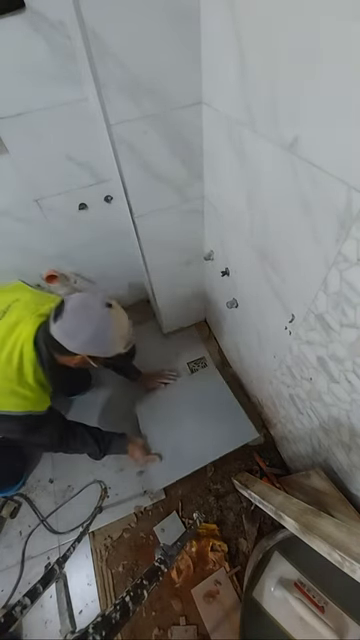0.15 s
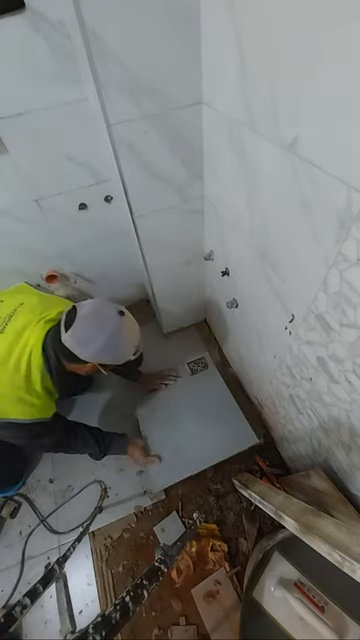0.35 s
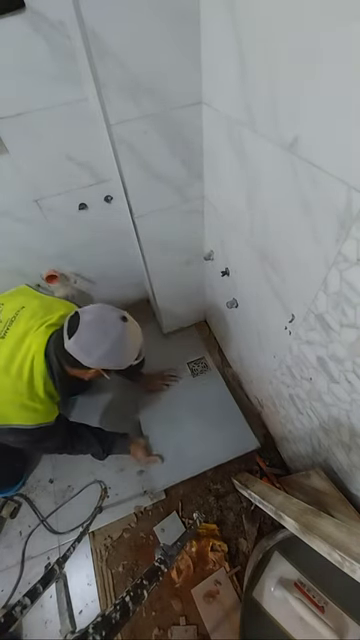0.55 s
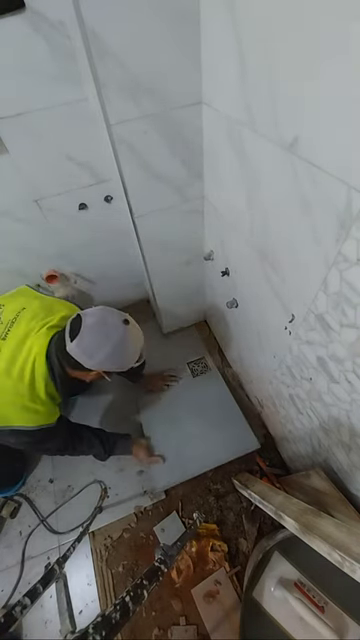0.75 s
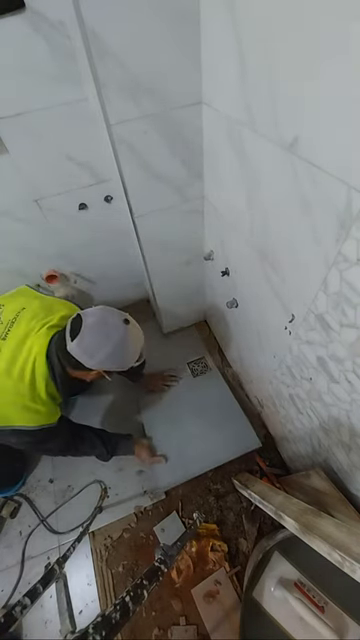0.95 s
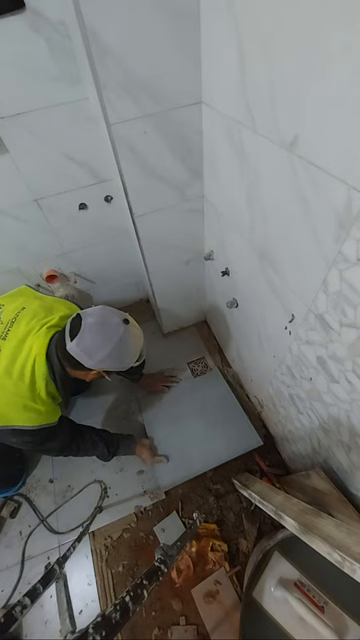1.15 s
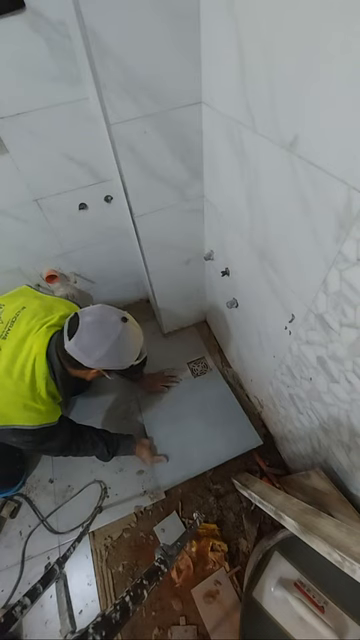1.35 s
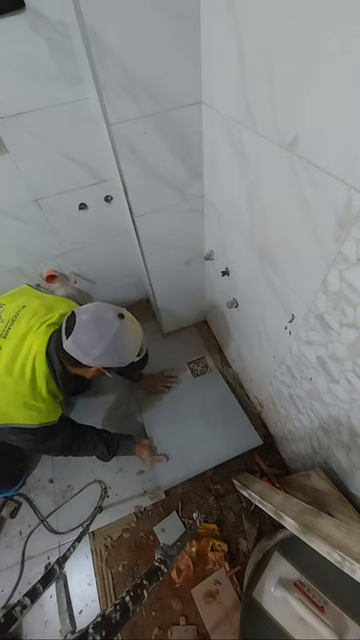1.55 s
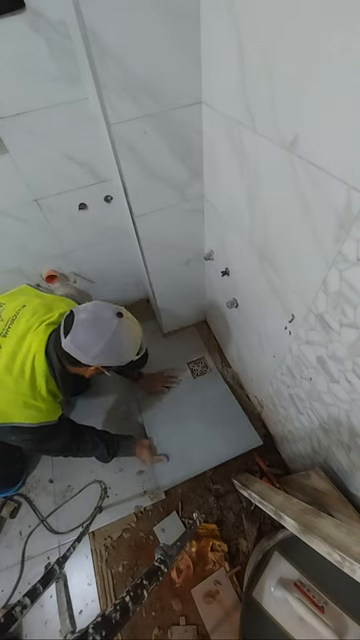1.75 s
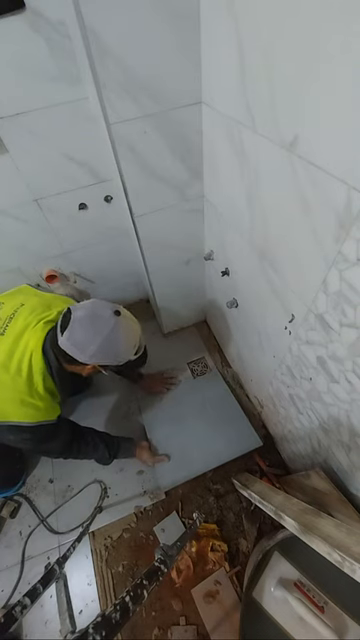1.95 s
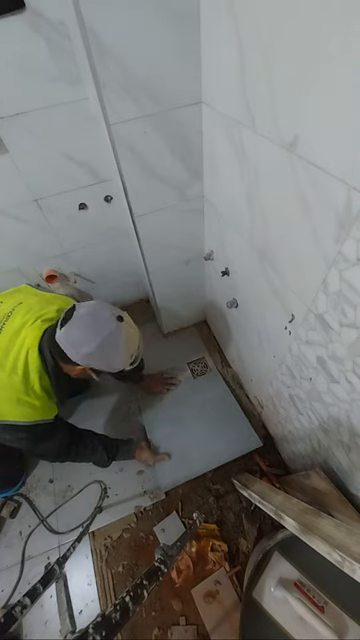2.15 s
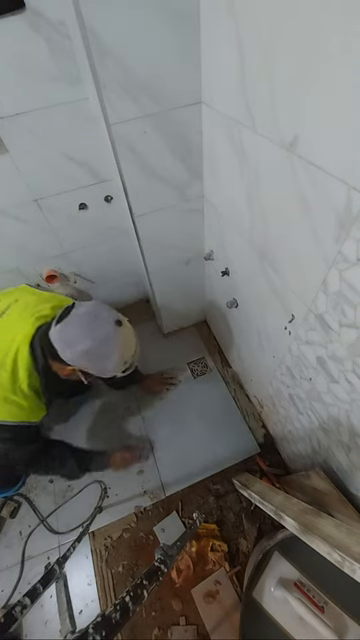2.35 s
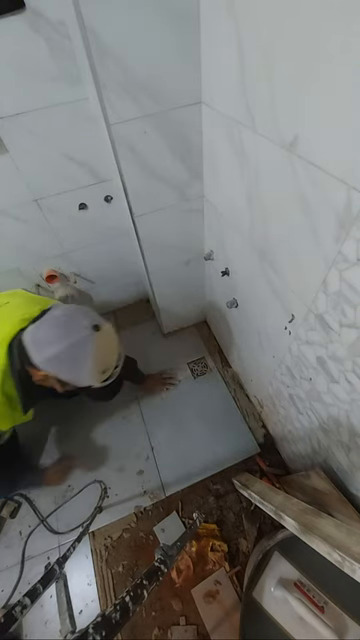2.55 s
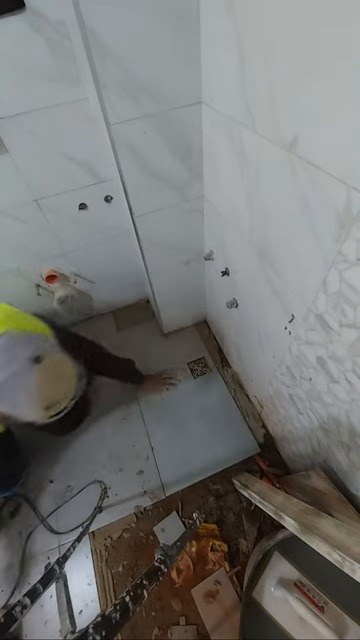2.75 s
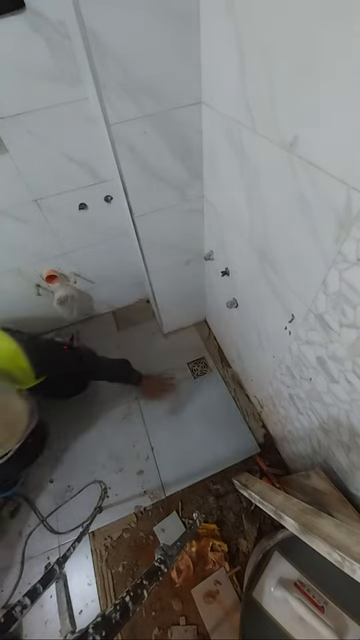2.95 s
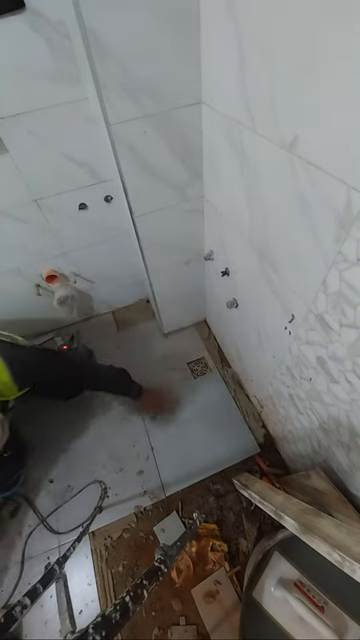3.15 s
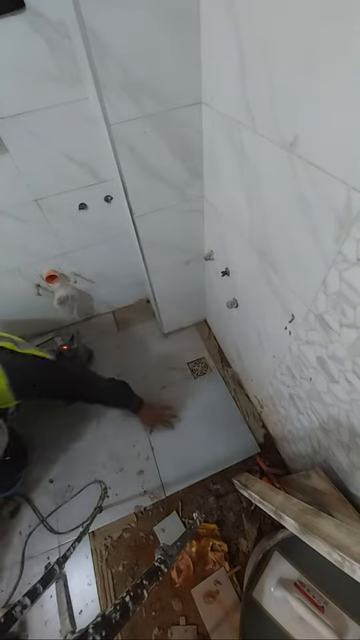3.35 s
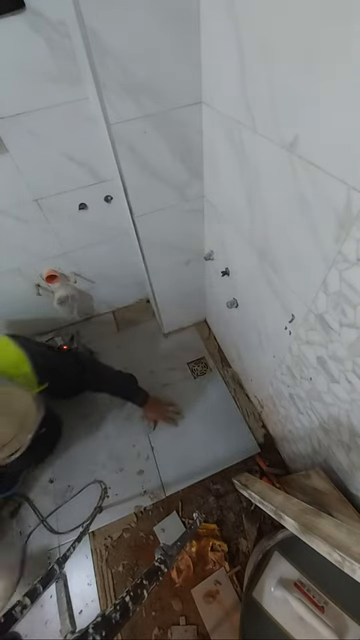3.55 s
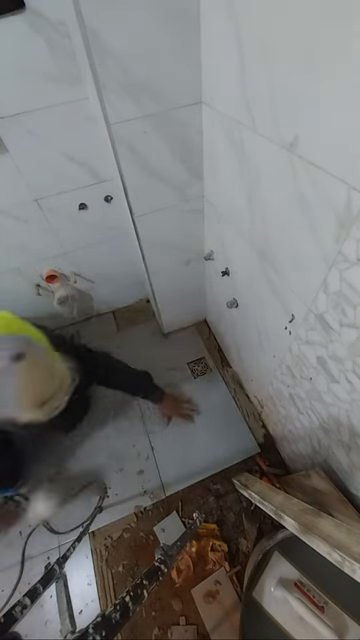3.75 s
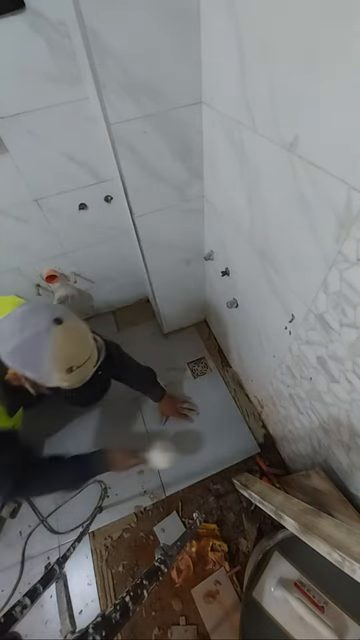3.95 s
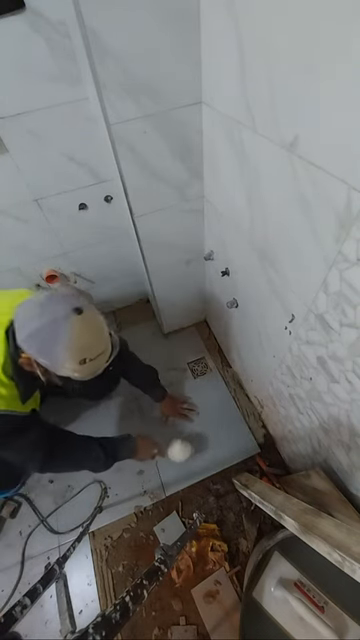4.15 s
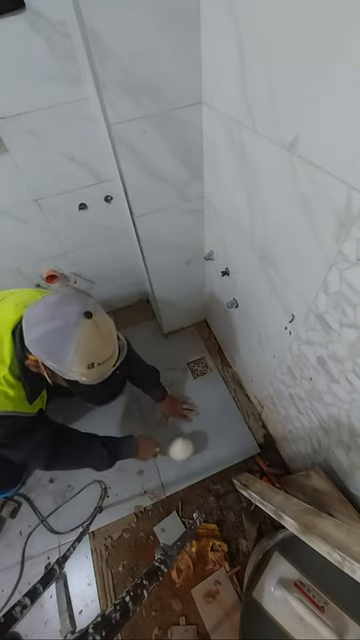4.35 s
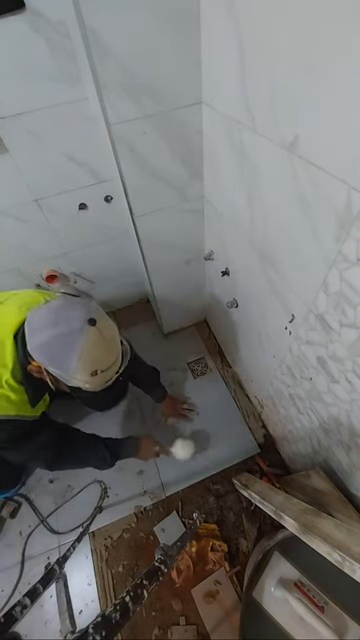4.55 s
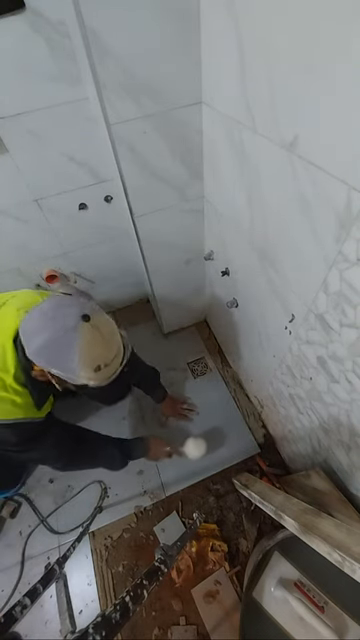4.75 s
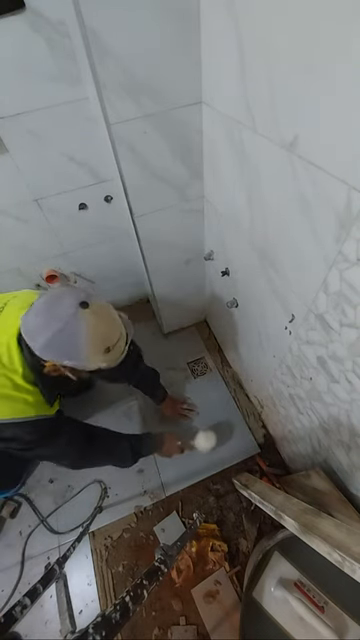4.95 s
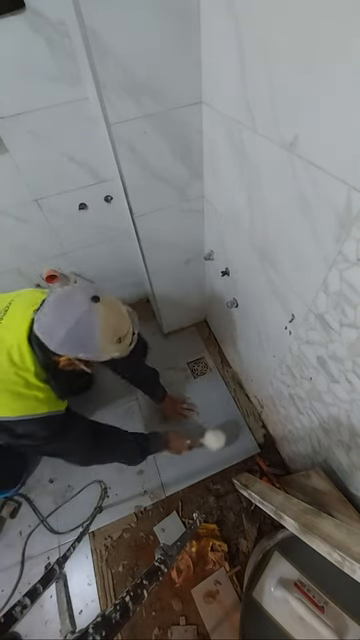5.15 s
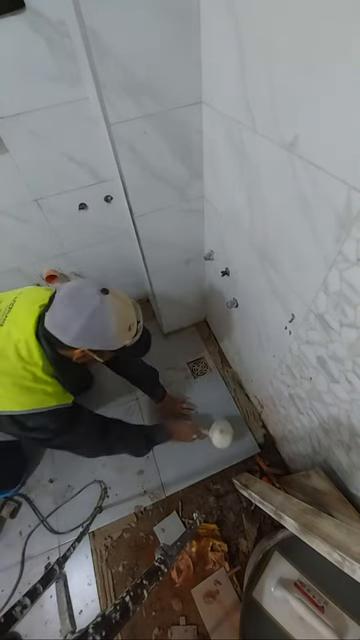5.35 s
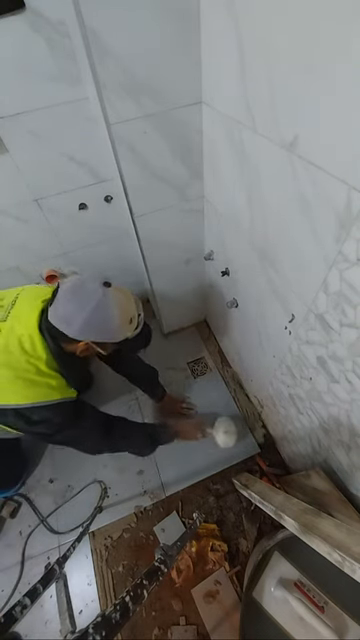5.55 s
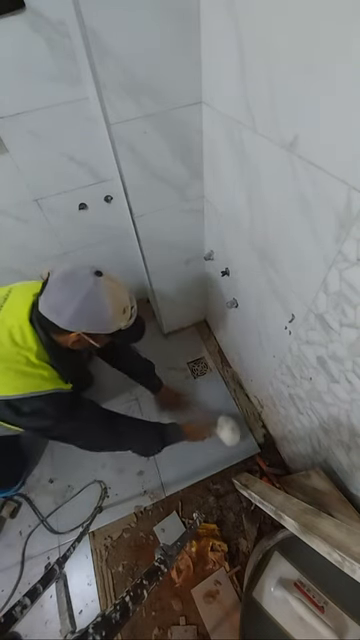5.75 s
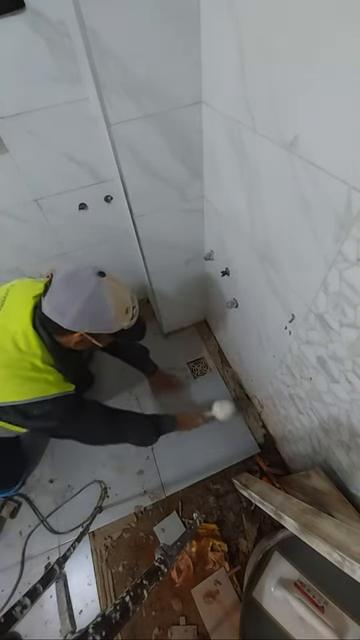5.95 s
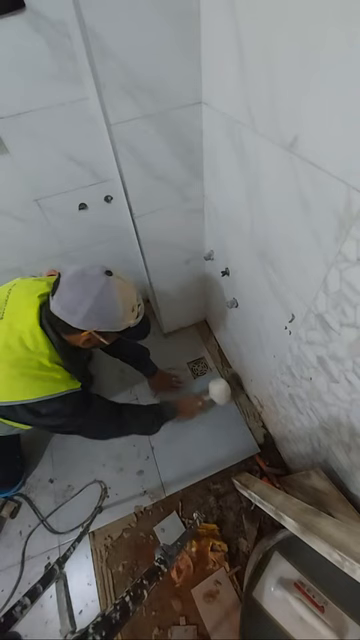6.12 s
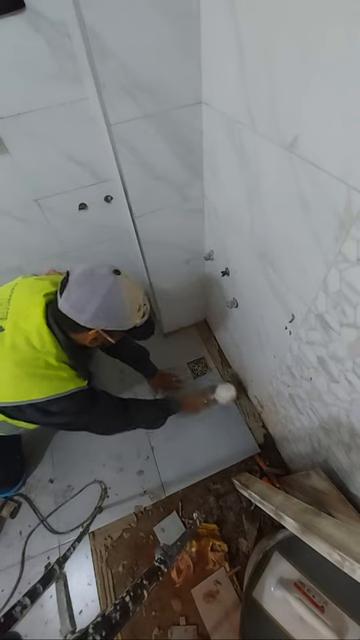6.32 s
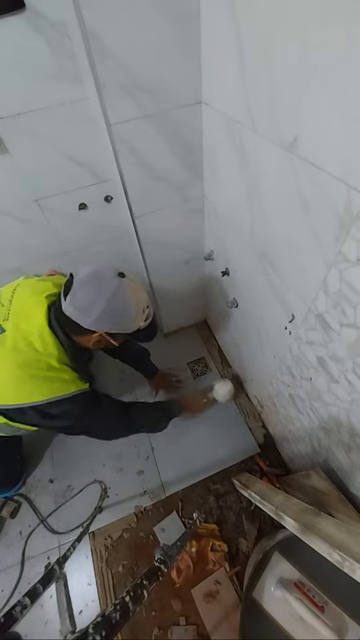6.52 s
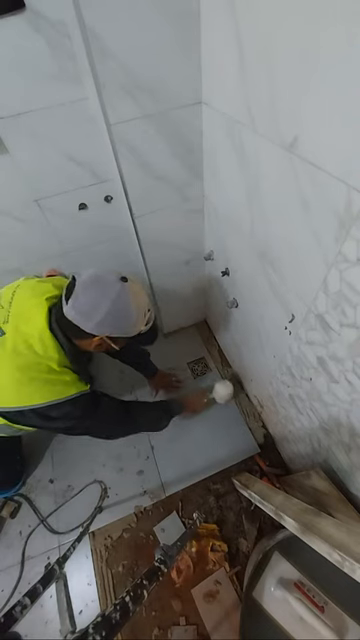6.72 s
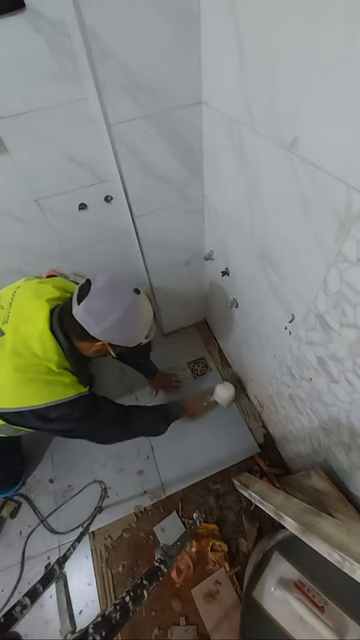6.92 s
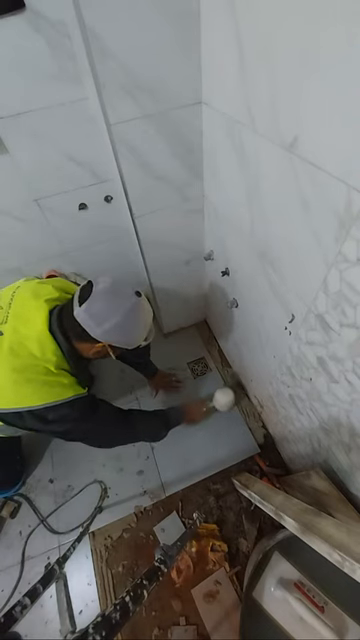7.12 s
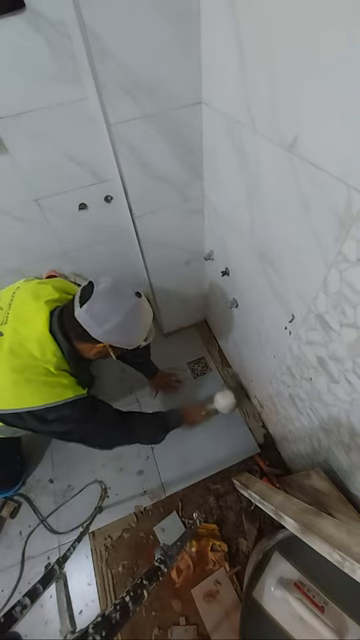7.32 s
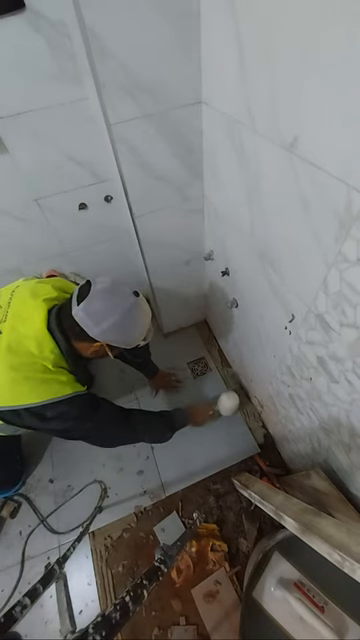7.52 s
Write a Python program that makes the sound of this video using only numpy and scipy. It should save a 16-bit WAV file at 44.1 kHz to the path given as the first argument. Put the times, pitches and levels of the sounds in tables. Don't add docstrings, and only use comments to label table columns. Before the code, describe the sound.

Gritty tile scraping and a clunk, a short pause, then even rubber mallet blows, first boomy, then brighter at the edge, echoing off hard walls.

```python
import sys
import numpy as np
from scipy import signal
from scipy.fft import rfft, irfft
from scipy.io import wavfile

SR = 44100
rng = np.random.default_rng(int(sys.argv[2]) if len(sys.argv) > 2 else 0)


def file_out(sig):
    cols = np.atleast_2d(sig).T
    lim = np.clip(cols, -1, 1)
    pcm = np.round(lim * 32767).astype(np.int16)
    wavfile.write(sys.argv[1], SR, pcm)


def rack_gain(trim_db):
    fader = np.asarray(trim_db, float)
    return 10 ** (fader / 20)


N = 338688

# (frequency [Hz], t60 [s])
ROOM_T60_S = [(100, 0.71), (420, 0.6), (1100, 0.38), (2900, 0.43), (7700, 0.24), (15000, 0.3)]

# (peak time [s], peak level [dB], 20 dB rise [s], 20 dB fall [s])
JACKET_SWELLS = [(0, -57, .1, .6), (.27, -44.5, .027, 0.06), (.38, -51.5, .015, 0.33),
                 (.733, -50, 0.01, 0.042), (.83, -65, .05, .2), (1.18, -60, 0.0065, 0.062),
                 (1.74, -72, .12, .14), (1.93, -65.5, .2, .45), (2.15, -47.5, 0.026, 0.2),
                 (2.26, -48.5, .08, 0.046), (2.32, -38, 0.0095, 0.078), (2.74, -60.5, .05, 0.98),
                 (3.04, -79, 0.019, 0.17), (3.35, -57, 0.059, 0.25), (3.86, -53.5, 0.23, 0.2),
                 (5.71, -63.5, 0.051, 0.098), (5.79, -57, 0.04, .15), (5.872, -46, 0.23, 0.17)]
KNEE_SWELLS = [(0, -65, .1, .12), (.26, -55.5, .08, 0.23), (.79, -66, .21, 0.26), (1.02, -67, 0.4, 0.066),
               (1.18, -62, 0.032, 0.36), (1.65, -64, 0.15, .18), (2.2, -69, .07, .11),
               (2.6, -62.5, .021, 0.26), (3.4, -76.5, 1.5, 1.1), (3.84, -73, .13, .3),
               (5.85, -41.5, 0.27, 0.2)]
HUM_SWELLS = [
    (0, -53, .1, 0.15),
    (.26, -49, 0.033, 0.22),
    (.45, -45, 0.25, 0.05),
]
THRUM_SWELLS = [
    (.78, -57, 0.14, 0.22),
    (.98, -58, 0.22, .16),
]
GROAN_SWELLS = [
    (1.33, -53.5, 0.047, 0.34),
    (1.5, -57, .25, 0.17),
]
PUSH_SWELLS = [
    (0.203, -55, -0.01, -0.1),
    (0.27, -44.5, -0.1, 0.19),
    (0.388, -39.5, 0.1, 0.12),
    (0.81, -41.5, 0.46, 0.15),
    (0.988, -44.5, 0.15, .09),
    (1.372, -57, 0, 0.46),
    (1.67, -50.5, 0.03, 0.21),
]
SEATING_SWELLS = [
    (2.25, -33.5, 0.094, .1),
    (2.324, -30, 0.024, 0.0073),
]

# (time [s], drone level [dB], whine frequency [Hz])
MACHINE_COURSE = [(0, -72, 620), (.3, -66, 620), (.98, -51, 625), (1.42, -49, 600), (1.72, -52.5, 610),
                  (2.1, -52, 670), (2.3, -51, 640), (3.85, -49.5, 638), (4.1, -53, 625), (7.68, -53, 645)]
# (frequency [Hz], width [Hz], level [dB])
DRONE_PEAKS = [(487, 49, -2.5), (577, 120, 0), (658, 89, -1.5), (1046, 70, -12.5), (1245, 110, -14.5),
               (1900, 260, -26.5)]
# (frequency [Hz], density [dB per Hz])
RUSTLE_SPECTRUM = [(900, -22), (1600, -3), (4100, -0.5), (8500, -3.5), (11500, 4), (13000, 6.5),
                   (15700, 4.5), (16100, -24)]
# (frequency [Hz], density [dB per Hz])
AIR_SPECTRUM = [(24, -57), (40, -44), (351, -9.5), (637, -9), (753, -19), (1160, -10), (1470, -20),
                (1910, -17.5), (2370, -28), (9010, -33), (12000, -28), (15600, -47), (22000, -120)]
AIR_DB, HUM_HZ = -63, 220

# (time [s], peak level [dB])
EDGE_JOLTS = [(0.203, -26.5), (0.259, -22), (0.385, -23.5), (0.527, -30), (0.6113, -38.5), (0.685, -34.5),
              (0.748, -33.5), (0.805, -29), (0.988, -31.5), (1.175, -26), (1.37, -32.5), (1.484, -48),
              (1.556, -35.5), (2.046, -45)]
SLAB_KNOCK_S = [1.178]
SLAB_KNOCK_DB, SLIDE_FROM_S = -28.5, 0.199
# (frequency [Hz], width [Hz], level [dB])
FREE_TILE_PEAKS = [(234, 10, -8.5), (414, 17, -5.5), (561, 43, 0.5), (907, 14, -20), (1035, 17, 3.5),
                   (1200, 13, 3), (1474, 20, 2), (1663, 20, 2), (1782, 36, 6), (2150, 29, 0.5),
                   (2593, 31, -2.5), (2990, 13, -4.5), (3660, 92, -15), (3930, 53, -2.5), (4600, 55, -10)]
# (frequency [Hz], width [Hz], level [dB])
SEATING_TILE_PEAKS = [(435, 20, -0.5), (542, 41, 4.5), (1007, 30, -3), (1166, 32, -0.5), (1730, 120, -9.5),
                      (2640, 28, -8)]
# (frequency [Hz], width [Hz], level [dB])
RIM_PEAKS = [(4800, 85, -4), (5920, 35, 1), (6560, 47, -5), (7970, 67, -4), (10400, 23, -13),
             (11400, 26, -6)]
# (frequency [Hz], density [dB per Hz])
GRIT_SPECTRUM = [(35, -48), (70, -15), (240, -9.5), (340, -10), (600, -2.5), (1700, -5.5), (4000, -10.5),
                 (9000, -23.5), (15500, -25.5)]

# (time [s], force [dB], knock [dB], glaze ring [dB], flat slap [dB])
BLOWS_DB = [(2.3188, -25.5, -22.5, -19, -33), (4.0801, -20, -18.5, -15, -35.5),
            (4.3146, -17, -17, -24, -46.5), (4.5384, -10.5, -13.5, -23, -45),
            (4.7804, -5, -12.5, -20.5, -40), (4.9851, -5.5, -9.5, -21, -32.5),
            (5.1803, -13, -18.5, -26, -44.5), (5.385, -18, -20, -28, -53.5), (5.5886, -19, -20.5, -27, -58),
            (6.018, -5, -13.5, -19, -31), (6.2262, -7, -11.5, -22, -28), (6.4257, -9, -8, -11.5, -26.5),
            (6.6265, -7, -8, -16, -24), (6.8139, -7.5, -10, -23, -40.5), (7.0115, -6.5, -8.5, -12.5, -21),
            (7.2015, -5.5, -10, -12.5, -27), (7.3947, -4.5, -11, -8.5, -17.5),
            (7.6409, -15, -21.5, -27.5, -43)]
# (time [s], peak level [dB])
GRIT_PUFFS = [(0.737, -35.5), (0.7475, -49), (2.799, -40.5), (2.8509, -47), (3.037, -47), (4.082, -27),
              (4.3165, -36), (4.5284, -34), (4.7805, -35), (4.985, -43), (5.1836, -45), (5.3896, -47),
              (5.5917, -45)]
# (time [s], level [dB])
HOLLOW_DB = [
    (2.32, -20),
    (4.08, -11),
    (4.7, -8),
    (5.2, -17),
    (5.6, -15),
    (6.0, -24),
    (6.6, -22.5),
    (7.68, -23.5),
]
# (frequency [Hz], level struck mid-tile [dB], level near edge [dB], t60 [s])
BOOM_MODES_DB = [(76.7, -12.5, -3.5, 0.8), (85.1, -6.5, 0, 0.5), (111.8, 0.5, 8, 0.062),
                 (123.8, 5.5, 11.5, 0.21), (138, -0.5, -4, 0.25)]
BODY_MODES_DB = [(155.6, -28.5, -15, 0.7), (189.2, -4, -6, 0.46), (216.2, -21, -14, 0.37),
                 (245.3, -3, -4, 0.5), (276.8, 0, -4.5, 0.35), (293, 3, 2, 0.18), (318.4, -1, -2, 0.32),
                 (335.4, -12, -11, 0.27)]
KNOCK_MODES_DB = [(398, -0.5, -12, 0.41), (424, 0.5, 0.5, 0.28), (441.5, -10, -29, 0.61),
                  (498.2, -9.5, 0.5, 0.54), (525, -15, -4.5, 0.61), (553.6, -15, -7.5, 0.5),
                  (608.7, -5.5, -14.5, 0.28), (687, -13, -11, 0.45), (743, -30, -17.5, 1),
                  (820, -23.5, -20, 0.58), (923, -25.5, -25, 0.7)]
# (frequency [Hz], width [Hz], level [dB])
BEDDED_TILE_PEAKS = [(920, 26, -8.5), (1053, 22, 6.5), (1190, 150, -5), (1290, 18, -1.5), (1380, 63, -6.5),
                     (1760, 58, 11), (1840, 37, -7), (2488, 25, 9.5), (2760, 140, -1), (3430, 66, 9.5),
                     (4330, 130, -11), (4830, 33, 10), (6650, 250, -1)]
EDGE_FROM_S = 5.8

# (start [s], end [s])
DROPOUTS_S = [
    (5.727, 5.750),
    (7.5885, 7.6205),
]


def unit(x):
    return x / np.sqrt(np.mean(x ** 2) + 1e-20)


def white():
    return rng.standard_normal(N)


def in_time(rows):
    s, *columns = np.transpose(rows)
    t = np.arange(N) / SR
    return [np.interp(t, s, c) for c in columns]


def drift(per_s):
    r = np.exp(-2 * np.pi * per_s / SR)
    settled = signal.lfilter([1], [1, -2 * r, r * r], rng.standard_normal(N + SR))[SR:]
    return unit(settled)


def swells(rows):
    t = np.arange(N) / SR
    gain = 0
    for peak_s, peak_db, rise_s, fall_s in rows:
        below_peak = np.maximum((peak_s - t) / rise_s, (t - peak_s) / fall_s)
        gain = gain + rack_gain(peak_db - 20 * below_peak)
    return gain


def band(x, lo_hz, hi_hz):
    return signal.sosfilt(signal.butter(2, [lo_hz, hi_hz], "band", fs=SR, output="sos"), x)


def coloured(x, spectrum):
    hz, level_db = np.transpose(spectrum)
    grid_hz = np.maximum(np.fft.rfftfreq(len(x), 1 / SR), 1)
    gain_db = np.interp(np.log(grid_hz), np.log(hz), level_db)
    return irfft(rfft(x) * rack_gain(gain_db), len(x))


def resonate(x, peaks):
    out = 0
    for k, (hz, width_hz, level_db) in enumerate(peaks):
        r = np.exp(-np.pi * width_hz / SR)
        gain = (-1) ** k * rack_gain(level_db) / np.sqrt(width_hz)
        poles = [1, -2 * r * np.cos(2 * np.pi * hz / SR), r * r]
        out = out + gain * signal.lfilter([1 - r * r, 0, r * r - 1], poles, x)
    return out


def by_gain(shape, force, table):
    return shape(force, table) / np.std(shape(rng.standard_normal(SR), table))


def strikes(times_s, level_db, shape):
    clicks = np.zeros(N)
    clicks[(np.asarray(times_s) * SR).astype(int)] = rack_gain(level_db)
    return signal.fftconvolve(clicks, shape)[:N]


def echoing(times_s, level_db, lo_hz, hi_hz, t60_s, wet_db):
    t = np.arange(SR) / SR
    hz, room_t60_s = np.transpose(ROOM_T60_S)
    tail_t60_s = np.interp(np.log(lo_hz * hi_hz) / 2, np.log(hz), room_t60_s)
    burst = rack_gain(-60 * t / t60_s) * np.minimum(t / 0.001, 1)
    tail = rack_gain(wet_db - 60 * t / tail_t60_s) * (1 - np.exp(-t / 0.0033))
    power = strikes(times_s, 2 * level_db, burst ** 2 + tail ** 2)
    return band(white() * np.sqrt(np.maximum(power, 0)), lo_hz, hi_hz)


def room_air():
    sway_db = 0.8 * drift(4)
    return rack_gain(AIR_DB + sway_db) * unit(coloured(white(), AIR_SPECTRUM))


def far_machine():
    drone_db, whine_hz = in_time(MACHINE_COURSE)
    drone = unit(resonate(resonate(white(), DRONE_PEAKS), [(746, 5000, 0)]))
    whine = (0.75 + drift(17)) * np.sin(2 * np.pi * np.cumsum(whine_hz) / SR)
    return rack_gain(drone_db + 1.36 * drift(18.0)) * (rack_gain(-4) * drone + rack_gain(-2.5) * whine)


def pipe_hum():
    t = np.arange(N) / SR
    return swells(HUM_SWELLS) * np.sin(2 * np.pi * HUM_HZ * t + 1.2 * drift(9))


def jacket():
    rustle = unit(coloured(white(), RUSTLE_SPECTRUM))
    return swells(JACKET_SWELLS) * rack_gain(0.5 + 0.95 * drift(30)) * rustle


def knees():
    rumble = unit(band(band(white(), 75, 184), 75, 184))
    return swells(KNEE_SWELLS) * rack_gain(1.5 * drift(11)) * rumble


def slab_thrum():
    return swells(THRUM_SWELLS) * unit(band(band(white(), 62, 87), 62, 82))


def grit_grains():
    hit = rng.random(N) < 3500 / SR
    force_db = 3.65 * np.minimum(rng.exponential(1, N), 4)
    grains = unit(hit * rack_gain(force_db) * rng.choice([-1, 1], N))
    return grains * rack_gain(1.9 * drift(21))


def tile_drag():
    grains = grit_grains()
    jolt_s, jolt_db = np.transpose(EDGE_JOLTS)
    loose = np.arange(N) > SLIDE_FROM_S * SR
    sliding = grains * swells(PUSH_SWELLS) * loose
    sliding += echoing(jolt_s, jolt_db - 6, 104, 15000, t60_s=0.04, wet_db=-5.5)
    seating = grains * swells(SEATING_SWELLS)
    out = rack_gain(-1.5) * by_gain(resonate, sliding, FREE_TILE_PEAKS)
    out += rack_gain(3.0) * by_gain(resonate, seating, SEATING_TILE_PEAKS)
    groan = unit(resonate(grains, [(420, 26, 8), (360, 60, -12), (480, 55, -7)]))
    out += swells(GROAN_SWELLS) * groan
    rim_force = echoing(jolt_s, jolt_db - 16, 3500, 11000, t60_s=0.025, wet_db=-20.5)
    out += by_gain(resonate, rim_force, RIM_PEAKS)
    out += echoing(SLAB_KNOCK_S, SLAB_KNOCK_DB, 180, 1100, t60_s=0.09, wet_db=-12)
    return out + rack_gain(-3.0) * by_gain(coloured, sliding + seating, GRIT_SPECTRUM)


def modes_rung(modes, level_db, swell_s, trim_db, early_db):
    times_s = np.array(BLOWS_DB)[:, 0]
    t = np.arange(SR) / SR
    spot = rng.standard_normal((len(times_s), len(modes)))
    phase = rng.uniform(0, 2 * np.pi, len(modes))
    out = 0
    for k, (hz, middle_db, edge_db, t60_s) in enumerate(modes):
        fade = rack_gain(-60 * t / t60_s) + rack_gain(early_db - 60 * t / 0.048)
        fade = fade * (1 - np.exp(-(t / swell_s) ** 2))
        mode_db = np.where(times_s < EDGE_FROM_S, middle_db, edge_db)
        blow_db = level_db + mode_db + trim_db + 2.28 * spot[:, k]
        out = out + strikes(times_s, blow_db, np.sin(2 * np.pi * hz * t + phase[k]) * fade)
    return out


def boom_body_knock():
    s, body_db, knock_db, _, _ = np.transpose(BLOWS_DB)
    boom_db = np.interp(s, *np.transpose(HOLLOW_DB))
    out = modes_rung(BOOM_MODES_DB, boom_db, swell_s=0.0079, trim_db=-1, early_db=-32)
    out += modes_rung(BODY_MODES_DB, body_db, swell_s=0.002, trim_db=-8, early_db=0.5)
    out += modes_rung(KNOCK_MODES_DB, knock_db, swell_s=0.001, trim_db=-9.5, early_db=8.5)
    body = echoing(s + 0.0022, body_db + 11.0, 130, 333, t60_s=0.008, wet_db=-2.5)
    out += band(body, 142, 345)
    knock = echoing(s, knock_db + 5.5, 350, 817, t60_s=0.052, wet_db=-4.0)
    out += band(knock, 387, 1360)
    thump_db = boom_db + np.where(s < 3, 3, 14.5)
    thump = echoing(s, thump_db, 94, 167, t60_s=0.027, wet_db=-3)
    return out + band(thump, 95, 168)


def glaze_slap():
    s, _, _, ring_db, slap_db = np.transpose(BLOWS_DB)
    glaze = echoing(s, ring_db + 7.5, 876, 1368, t60_s=0.053, wet_db=-4.5)
    glaze += echoing(s, ring_db + 2.5, 1490, 2094, t60_s=0.017, wet_db=-7.5)
    glaze += echoing(s, (ring_db + slap_db) / 2 + 3, 1940, 4330, t60_s=0.043, wet_db=-9)
    glaze += echoing(s, slap_db + 11, 3700, 7960, t60_s=0.017, wet_db=-16.0)
    out = glaze + rack_gain(-10.5) * by_gain(resonate, glaze, BEDDED_TILE_PEAKS)
    out += echoing(s - 0.005, slap_db - 9, 1700, 6200, t60_s=0.037, wet_db=-17)
    puff_s, puff_db = np.transpose(GRIT_PUFFS)
    out += echoing(puff_s, puff_db + 3, 11300, 19000, t60_s=0.02, wet_db=-9.0)
    out += echoing(s, slap_db - 22.0, 12000, 13800, t60_s=0.014, wet_db=-17)
    sizzle_db = np.where(s < EDGE_FROM_S, slap_db - 1, 0.74 * slap_db - 8)
    return out + echoing(s, sizzle_db, 10000, 16400, t60_s=0.03, wet_db=-9)


def mallet():
    return signal.lfilter(*signal.iirnotch(368, 20, fs=SR), boom_body_knock() + glaze_slap())


def scene():
    background = room_air() + far_machine() + pipe_hum() + jacket() + knees() + slab_thrum()
    return (background + tile_drag() + mallet())[None]


def low_pass(x):
    return signal.sosfilt(signal.butter(12, 16970, fs=SR, output="sos"), x)


def record(dry):
    x = signal.sosfilt(signal.butter(5, 66, "high", fs=SR, output="sos"), dry)
    handling_db = -80.5 + 2.5 * drift(2.5)
    x = x + rack_gain(handling_db) * unit(band(white(), 48, 85))
    x = signal.sosfilt(signal.cheby2(14, 45, 15980, fs=SR, output="sos"), x)
    x = np.clip(2.145 * np.tanh(x / 2.268), -1, 1)
    x = signal.sosfilt(signal.cheby2(14, 60, 17200, fs=SR, output="sos"), x)
    t = np.arange(N) / SR
    (dip_from_s, dip_to_s), (mute_from_s, mute_to_s) = DROPOUTS_S
    dip = np.clip(np.minimum(t - dip_from_s, dip_to_s - t) * 250, 0, 1)
    heard = (t < mute_from_s) | (t > mute_to_s)
    return low_pass(x * rack_gain(-11 * dip) * heard)


dry = scene()
out = record(dry)
file_out(out)
```